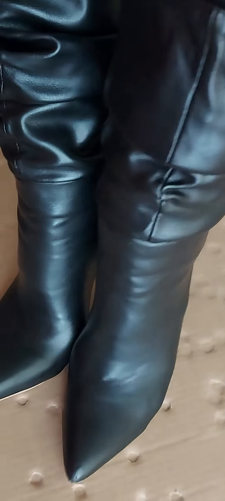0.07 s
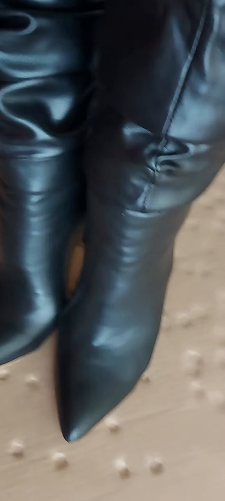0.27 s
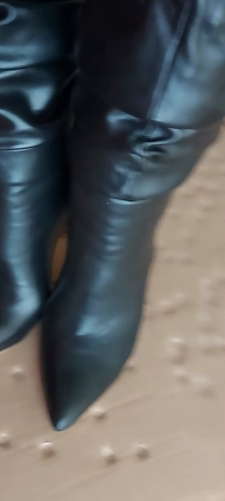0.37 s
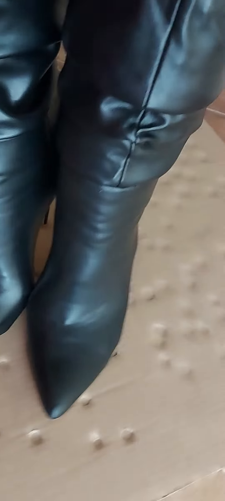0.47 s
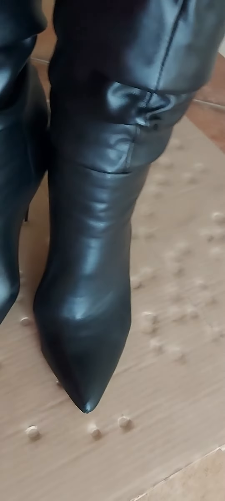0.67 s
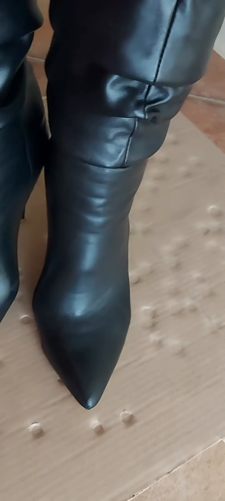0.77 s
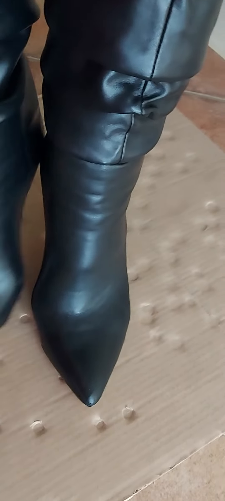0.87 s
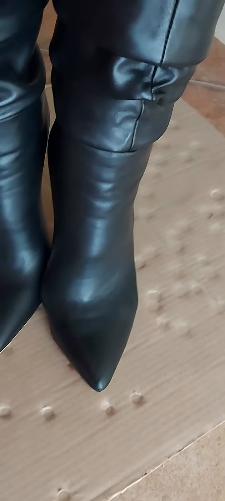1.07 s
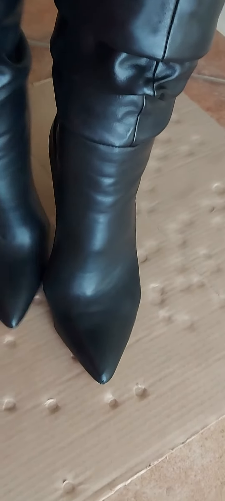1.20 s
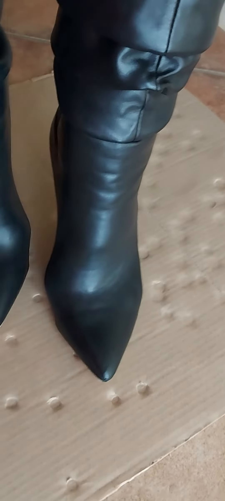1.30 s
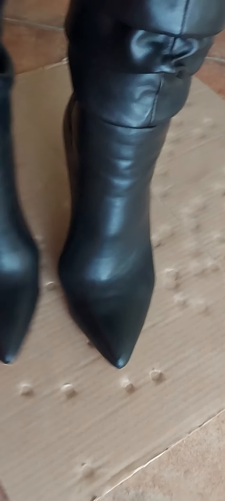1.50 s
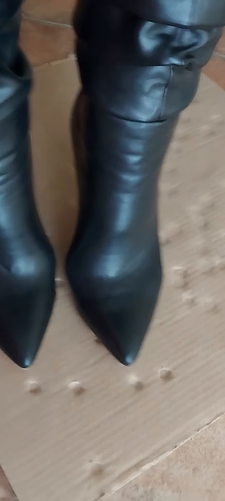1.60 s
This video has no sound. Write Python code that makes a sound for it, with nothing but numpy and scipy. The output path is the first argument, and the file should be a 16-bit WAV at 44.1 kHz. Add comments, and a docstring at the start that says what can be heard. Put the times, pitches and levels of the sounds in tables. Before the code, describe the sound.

Leather boots squeak and creak as they shift on cardboard, which crunches under a heel.

```python
"""A light rustle of leather, then a falling squeak: tall boots shift on a cardboard sheet in a bare,
tiled room. A heel comes down with a low boom and crushes the cardboard, which crunches and snaps.
The shafts rub together, creak in single jerks and squeak twice more in stick-slip glides, then a heel
booms again, more softly. Between the moves the leather rustles over the room's quiet air."""
import sys
import numpy as np
from scipy import signal
from scipy.fft import rfft, irfft, next_fast_len
from scipy.io import wavfile
from scipy.ndimage import map_coordinates

SR = 44100
rng = np.random.default_rng(int(sys.argv[2]) if len(sys.argv) > 2 else 0)


def generate_wav(signal):
    """Clip the signal to [-1, 1] and save it as 16-bit WAV at the path in sys.argv[1]."""
    frames = np.transpose(np.atleast_2d(signal))
    scaled = np.clip(frames, -1, 1) * 32767
    pcm = np.round(scaled).astype(np.int16)
    wavfile.write(sys.argv[1], SR, pcm)


N = 72765
TOP_HZ = 15850


def amp(db):
    return 10 ** (np.asarray(db) / 20)


def unit_rms(x):
    return x / np.sqrt(np.mean(x ** 2) + 1e-20)


def clock():
    return np.arange(N) / SR


def curve_at(points, hz):
    """Read (freq_hz, value) points along a log frequency axis."""
    freqs, values = np.transpose(points)
    return np.interp(np.log(hz + 1), np.log(freqs + 1), values)


def wobble(knots_per_s):
    """A smooth random curve."""
    knots = rng.standard_normal(int(N * knots_per_s / SR) + 4)
    return map_coordinates(knots, [clock() * knots_per_s])


def filtered(x, response):
    """Shape x with a gain that is a function of frequency."""
    size = next_fast_len(N + SR // 2)
    return irfft(rfft(x, size) * response(np.fft.rfftfreq(size, 1 / SR)), size)[..., :N]


def noise(eq, grain_db=0, grains_per_s=900):
    """Coloured noise of rms 1; grain_db clumps it into short grains."""
    grains = rng.standard_normal(N) * amp(grain_db * np.tanh(wobble(grains_per_s)))
    return unit_rms(filtered(grains, lambda hz: amp(curve_at(eq, hz))))


def stereo_noise(eq, side_db):
    """Mid noise, widened by a quieter side noise."""
    return noise(eq) + amp(side_db) * noise(eq) * np.array([[1], [-1]])


def stroke(start, rise, hold, fall):
    """Gain that climbs 26 dB over the rise, holds, then drops 26 dB per fall time."""
    t = clock() - start
    return amp(-26 * np.maximum(0, np.maximum(1 - t / rise, (t - rise - hold) / fall)))


def swell(start, rise, t60):
    """Gain that grows steadily and then dies away."""
    t = clock() - start
    return np.clip(t / rise, 0, 1) * amp(-60 * np.maximum(t - rise, 0) / t60)


def jolts(hits, crack_eq, body_eq, rise_s, t60_s):
    """Short bursts, each a bright crack over a hollow body."""
    gains = np.array([amp(db) * swell(start, rise_s, t60_s) for start, db, _ in hits])
    body_gain = amp(np.transpose(hits)[2]) @ gains
    return gains.sum(0) * noise(crack_eq) + body_gain * noise(body_eq)


# Ring of the tiled room: freq_hz, t60_s
ROOM_DECAY = [(150, 0.61), (500, 0.85), (1000, 0.66), (3000, 0.52), (5000, 0.46), (10000, 0.37),
              (15000, 0.17)]


def room(x, direct_db, wet_db, pan_db):
    """Direct sound, its bounce off the hard floor and a diffuse stereo tail; positive pan is left."""
    build_s, bounce_db = 0.002, -14
    direct_s, bounce_s = [0, 0.000028], [0.0011, 0.0017]  # left and right delays
    hz, t, spectrum = signal.stft(rng.standard_normal((2, int(SR * 0.8))), SR, nperseg=256)
    decay = amp(-60 * t / curve_at(ROOM_DECAY, hz)[:, None]) * (1 - np.exp(-t / build_s))
    tail = signal.istft(spectrum * decay, SR, nperseg=256)[1]
    tail /= np.linalg.norm(tail, axis=1, keepdims=True)
    wet = signal.fftconvolve(x[None], tail, axes=1)[:, :N]
    delay = lambda pair_s, f: np.exp(-2j * np.pi * np.outer(pair_s, f))
    near = filtered(x, lambda f: delay(direct_s, f) + amp(bounce_db) * delay(bounce_s, f))
    return amp(direct_db) * near * amp([[pan_db / 2], [-pan_db / 2]]) + amp(wet_db) * wet


# Room tone: freq_hz, gain_db
AIR_EQ = [(20, -21), (45, -24), (75, -3), (120, 7), (170, -2), (320, -4), (650, -20), (1500, -33.5),
          (5000, -25.5), (10000, -14.5), (15500, -23)]


def room_air():
    """A steady bed of faint rumble and thin hiss."""
    return amp(-74.5) * stereo_noise(AIR_EQ, side_db=-6)


# Soft leans on the floor: start_s, level_db
WEIGHT_SHIFTS = [(0.096, -65.5), (.16, -77), (0.599, -40), (.715, -53.5), (1.038, -61.5), (1.599, -63)]


def weight_shifts(pitch_hz=83, rise_s=0.04, t60_s=0.11):
    """Weight moving between the feet stirs a faint low boom."""
    return sum(amp(db) * swell(start, rise_s, t60_s) * np.sin(2 * np.pi * pitch_hz * (clock() - start))
               for start, db in WEIGHT_SHIFTS)


# Light rubs of the shafts: start_s, rise_s, hold_s, fall_s, rustle_db, scuff_db
RUB_STROKES = [(-.01, 0.012, 0.03, 0.1, -52.5, -66), (0.153, 0.032, 0.049, .02, -58, -83.5),
               (0.465, 0.03, .03, 0.038, -59, -59), (1.59, 0.0074, 0.066, .05, -64, -82.5)]
# Airy leather rustle and dull sole scuff: freq_hz, gain_db
RUSTLE_EQ = [(30, -29), (200, 0), (1100, -4), (2500, -5.5), (5000, -1.5), (7500, -5), (10500, 1),
             (13000, -0.5), (15500, -8.5)]
SCUFF_EQ = [(30, -37.5), (150, -4.5), (350, 3), (600, 5), (850, 0.5), (1200, -8.5), (1600, -10.5),
            (2500, -28), (6000, -45)]


def leather_rubs():
    """Grainy rustle of leather sliding too lightly to squeak, while the sole scuffs."""
    out = np.zeros(N)
    for *timing, rustle_db, scuff_db in RUB_STROKES:
        rustle = amp(rustle_db) * noise(RUSTLE_EQ, grain_db=4.5)
        scuff = amp(scuff_db) * noise(SCUFF_EQ)
        out += stroke(*timing) * (rustle + scuff)
    return out


# Cardboard giving way: start_s, rise_s, hold_s, fall_s, crunch_db, crackle_db
CRUSH_STROKES = [(0.491, 0.047, 0.082, 0.065, -40.5, -44), (0.704, 0.0069, 0.032, 0.017, -48.5, -70)]
# Hollow crunch and bright crackle: freq_hz, gain_db
CRUNCH_EQ = [(30, -46.5), (100, -3.5), (200, 0), (400, -6.5), (650, 5), (800, -5), (1050, 2), (1500, -8),
             (2500, -14.5), (6000, -55.5)]
CRACKLE_EQ = [(400, -29.5), (1500, -5.5), (2500, -1.5), (4600, 1), (7000, -1), (10500, 2), (13000, 1.5),
              (15500, -10.5)]


def cardboard_crush():
    """The cardboard's flutes collapse under the sole."""
    out = np.zeros(N)
    for *timing, crunch_db, crackle_db in CRUSH_STROKES:
        crunch = amp(crunch_db) * noise(CRUNCH_EQ)
        crackle = amp(crackle_db) * noise(CRACKLE_EQ, grain_db=10, grains_per_s=200)
        out += stroke(*timing) * (crunch + crackle)
    return out


# Single snaps of the cardboard: start_s, level_db, relative_body_db
SNAP_HITS = [(.538, -37, -6), (.5442, -28.5, -10), (.5548, -29, -10), (.568, -37, -6), (.611, -32, -4),
             (.7085, -42, 7), (.719, -35, 0)]
# Crisp edge of a snap: freq_hz, gain_db
SNAP_EQ = [(100, -40.5), (400, -27), (1500, -5), (2500, 1.5), (4600, 4), (7000, -1.5), (10500, -0.5),
           (13000, 1), (15500, 2.5)]


def cardboard_snaps():
    """Short cracks, each carrying the cardboard's hollow tone."""
    return jolts(SNAP_HITS, SNAP_EQ, CRUNCH_EQ, rise_s=0.00039, t60_s=0.018)


# Heel falls: start_s, boom_db, thud_db
HEEL_HITS = [(.515, -36, -45), (1.263, -42.5, -47.5)]
# Low resonances under the heel: pitch_hz, gain_db, rise_s, t60_s
HEEL_MODES = [(118.2, 5, 0.056, 0.32), (78, -9, 0.1, 0.22), (65, -14, 0.082, 0.56)]
# Dull thud: freq_hz, gain_db
THUD_EQ = [(40, -28), (70, 10), (200, -3), (290, -1), (350, -6.5), (440, -2.5), (560, -22), (900, -34),
           (3000, -51.5)]


def heel_falls():
    """Each heel fall swells into a low boom over a dull thud."""
    out = np.zeros((2, N))
    for start, boom_db, thud_db in HEEL_HITS:
        boom = sum(amp(db) * swell(start, rise, t60) * np.sin(2 * np.pi * hz * (clock() - start))
                   for hz, db, rise, t60 in HEEL_MODES)
        thud = swell(start, rise=0.031, t60=0.54) * stereo_noise(THUD_EQ, side_db=-8.5)
        out += amp(boom_db) * boom + amp(thud_db) * thud
    return out


# Separate slips before a squeak takes hold or as it breaks up: start_s, level_db, relative_body_db
CREAK_HITS = [(0.164, -57.5, -5.5), (0.277, -51, -2), (0.2857, -30.5, -15), (.293, -46, 6.5),
              (0.8545, -40.5, -16.5), (0.869, -33.5, -18.5), (.878, -40, -14.5), (.884, -39.5, -4.5),
              (.889, -38.5, -16), (0.895, -39.5, -8.5), (.899, -34.5, -5.5), (0.905, -41.5, -12.5),
              (0.91, -38, -11.5), (.914, -33.5, -10)]
# Bite of a slip and hollow knock of the shaft: freq_hz, gain_db
CREAK_EQ = [(30, -67), (150, -42), (350, -11), (550, 1), (850, 6.5), (1250, -2), (1950, 3), (2500, -21),
            (3000, -26), (3800, -6.5), (7000, -17), (10500, -10.5), (15500, -10)]
SHAFT_EQ = [(30, -45), (100, -25), (170, -18.5), (300, -5), (470, -4.5), (700, -2.5), (1500, -21),
            (4000, -42)]


def leather_creaks(low_cut_hz=221):
    """The leather lets go in single jerks, each knocking the hollow boot; the jerks carry little bass."""
    jerks = jolts(CREAK_HITS, CREAK_EQ, SHAFT_EQ, rise_s=0.0008, t60_s=0.018)
    return signal.sosfilt(signal.butter(4, low_cut_hz, "highpass", fs=SR, output="sos"), jerks)


# Slip rate, one curve per squeak: time_s, pitch_hz
SQUEAK_GLIDES = [
    [(.18, 1280), (.198, 1210), (.214, 1170), (.231, 1255), (.248, 1090), (.260, 920), (.272, 640),
     (.292, 450)],
    [(.905, 750), (.918, 1100), (.926, 1850), (.931, 2000), (.942, 3150), (.951, 4100), (.961, 4350),
     (.976, 3450), (.988, 1650), (1.003, 1200)],
    [(1.056, 900), (1.066, 930), (1.081, 1170), (1.092, 1700), (1.102, 2200), (1.108, 3400), (1.118, 3500)],
]
# Rubbing force, one curve per squeak: time_s, level_db
SQUEAK_FORCES = [
    [(.18, -64), (.198, -46.5), (.222, -41), (.24, -40), (.255, -37), (.272, -42), (.282, -42),
     (.292, -44.5)],
    [(.905, -49), (.921, -43), (.929, -31.5), (.937, -34), (.949, -29), (.962, -34.5), (.976, -35.5),
     (.988, -39.5), (1.003, -43.5)],
    [(1.056, -64), (1.065, -40.5), (1.081, -39), (1.095, -41.5), (1.108, -33.5), (1.118, -74.5)],
]
# Character, one row per squeak: tilt_db_per_octave, hiss_db, wet_db, pan_db
SQUEAK_VOICES = [(-1, 0.5, 2.5, -0.5), (1, -7.5, -0.5, 1), (0, -8.5, -2, -1.5)]
# Tone of the slips and of the friction hiss: freq_hz, gain_db
SLIP_EQ = [(300, -17.5), (600, -7), (1100, 3), (1500, -2.5), (2100, 4.5), (3000, -1.5), (4100, 0),
           (5500, -9.5), (8000, -13), (12000, -5), (15500, -11)]
HISS_EQ = [(30, -85), (150, -48.5), (600, -33.5), (1100, -3), (2200, -6.5), (4200, 1.5), (5500, -3),
           (7500, -6), (11000, -1), (13500, -11), (15500, -10)]


def leather_squeak(glide, effort, tilt_db_per_octave, hiss_db, wet_db, pan_db):
    """Leather sticks and slips at a gliding, unsteady rate; each slip also lets out a puff of hiss."""
    regular_hz, shimmer_db = 1200, 4
    t = clock()
    sounding = (t > glide[0][0]) & (t < glide[-1][0])
    glide_hz = np.interp(t, *np.transpose(glide))
    jitter = 0.022 * np.maximum(regular_hz / glide_hz, 1) ** 3  # slower slips are less regular
    pitch_hz = glide_hz * np.exp(jitter * wobble(1100))
    phase = 2 * np.pi * np.cumsum(pitch_hz) / SR
    harmonics = np.arange(1, 41)[:, None]
    partial_hz = harmonics * pitch_hz[sounding]
    gains = amp(curve_at(SLIP_EQ, partial_hz) + tilt_db_per_octave * np.log2(harmonics))
    gains *= partial_hz < TOP_HZ
    partials = np.sin(harmonics * phase[sounding] + rng.uniform(0, 2 * np.pi, harmonics.shape))
    slips = np.zeros(N)
    slips[sounding] = (gains * partials).sum(0) / np.sqrt((gains ** 2).sum(0) / 2)  # rms 1
    puffs = rng.standard_normal(N) * (1 + np.cos(phase))
    hiss = amp(hiss_db) * unit_rms(filtered(puffs, lambda hz: amp(curve_at(HISS_EQ, hz))))
    force = sounding * amp(np.interp(t, *np.transpose(effort)) + shimmer_db * np.tanh(wobble(350)))
    return room(force * slips, 0, wet_db, pan_db) + room(force * hiss, 0, wet_db, pan_db)


def scene():
    """Leather and cardboard ring in the room, over the low booms and the quiet air."""
    squeaks = sum(leather_squeak(glide, effort, *voice)
                  for glide, effort, voice in zip(SQUEAK_GLIDES, SQUEAK_FORCES, SQUEAK_VOICES))
    crush = room(cardboard_crush(), direct_db=-4, wet_db=-3.5, pan_db=1.5)
    snaps = room(cardboard_snaps(), direct_db=0, wet_db=-3, pan_db=-2)
    creaks = room(leather_creaks(), direct_db=0, wet_db=-2, pan_db=-1)
    rubs = room(leather_rubs(), direct_db=-2, wet_db=0.5, pan_db=-4.5)
    return squeaks + crush + snaps + creaks + rubs + heel_falls() + weight_shifts() + room_air()


def record(dry):
    """A brick-wall high cut on the whole mix."""
    return filtered(dry, lambda hz: hz < TOP_HZ)


dry = scene()
out = record(dry)
generate_wav(out)
```